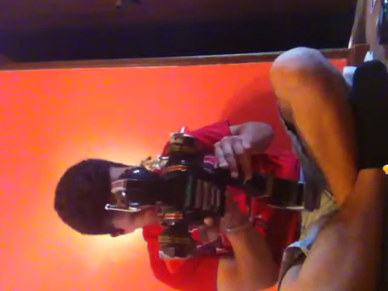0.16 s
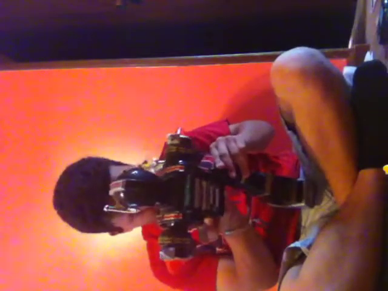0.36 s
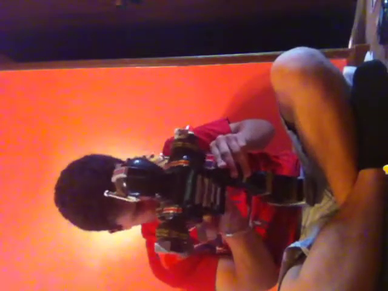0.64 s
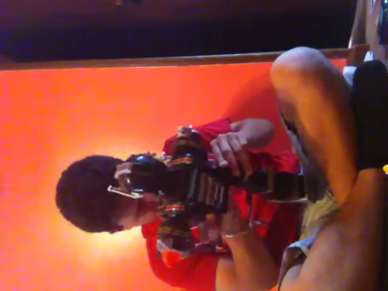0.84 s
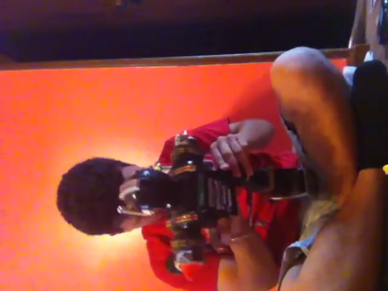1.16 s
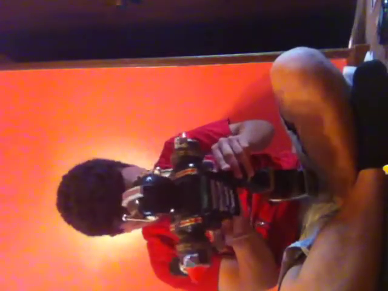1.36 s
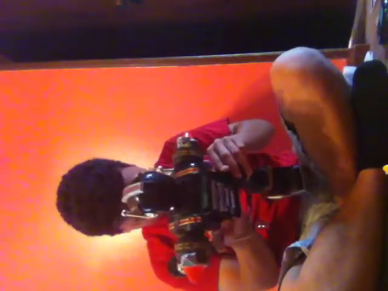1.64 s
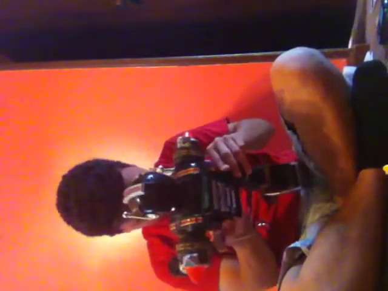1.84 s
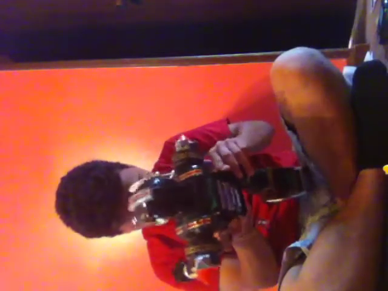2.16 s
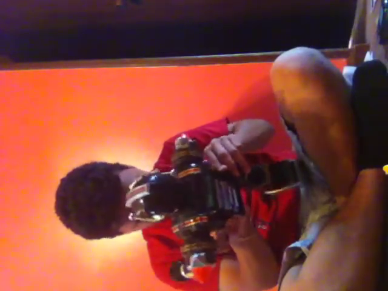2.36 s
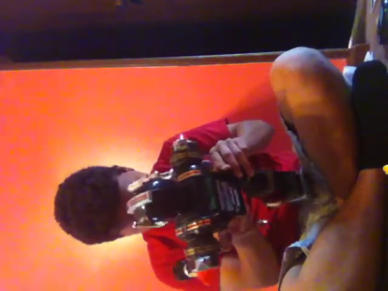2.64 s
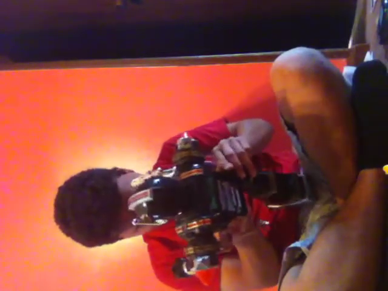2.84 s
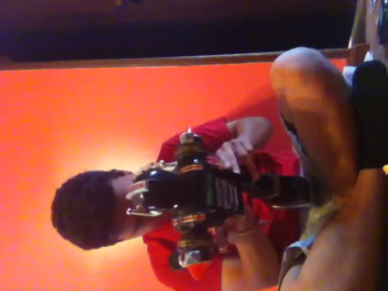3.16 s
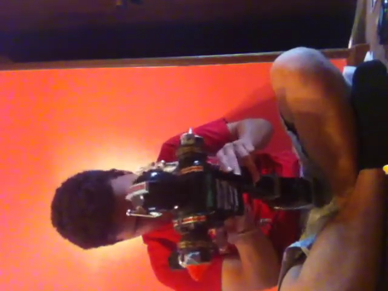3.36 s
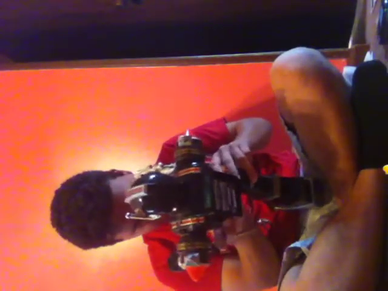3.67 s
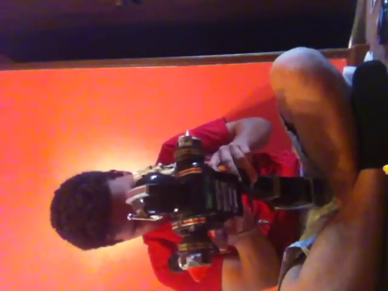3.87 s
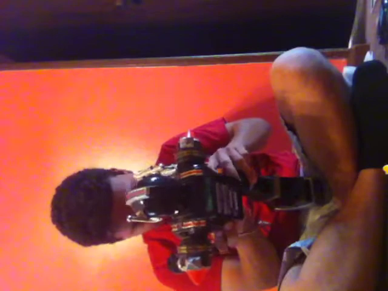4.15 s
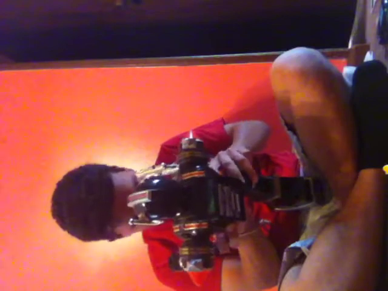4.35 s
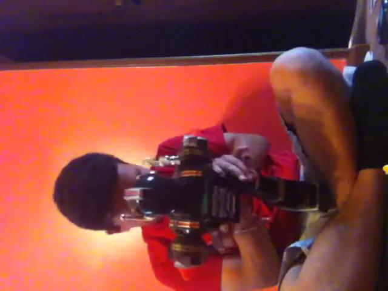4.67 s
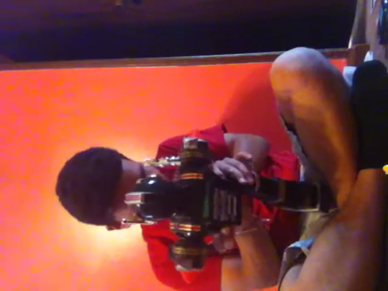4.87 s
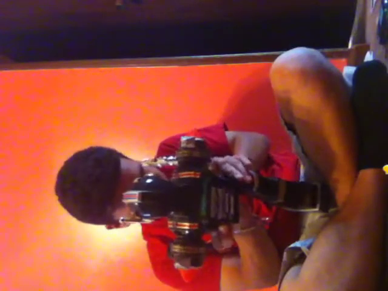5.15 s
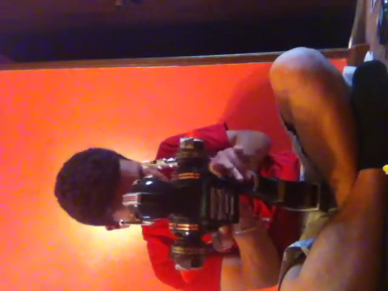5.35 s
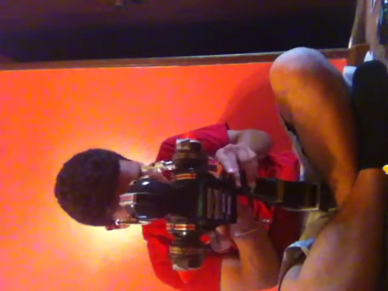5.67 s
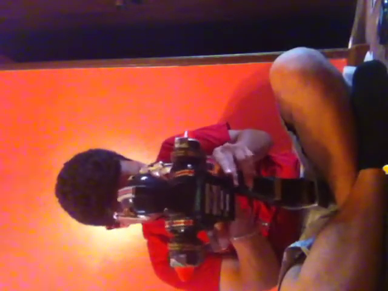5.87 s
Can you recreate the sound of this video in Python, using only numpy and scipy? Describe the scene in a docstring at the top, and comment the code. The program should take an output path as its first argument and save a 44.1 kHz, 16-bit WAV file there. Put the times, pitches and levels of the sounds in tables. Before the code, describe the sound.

A hollow plastic toy robot is handled in a small, quiet room, making short, irregular clicks, each with a tiny rattle and a slightly hollow knock. Faint rubs of sliding plastic run between them. Light ticks start at once, with sharper clicks at about 0.7, 2.3 and 2.9 seconds and small clusters in between. After a lull from about 3.2 to 3.8 seconds, light clicks return, with very faint fingertip taps and soft, low hand bumps from around 4.1. A tight joint gives one tiny, faint squeak at 4.6 seconds. A few quick clicks lead to a part snapping home at 4.9 seconds, by far the loudest sound, followed by another sharp click at 5.1. Lighter clicks and rubs continue until about 6 seconds. Each click has a brief room echo, over a faint, steady low hum and microphone hiss.

```python
"""A hollow plastic toy robot clicks as it is handled in a small, quiet room.
Each click is an edge slipping and striking: a small part rattles and the shell rings.
One part snaps home loudly. Sliding joints rub, a tight one squeaks once, fingertips
tap the shell and the hands bump softly. The walls echo briefly, over a low hum,
faint drones and microphone hiss."""
import sys
import numpy as np
from scipy import signal
from scipy.fft import rfft, irfft, next_fast_len
from scipy.io import wavfile
from scipy.ndimage import uniform_filter1d

SR = 44100
rng = np.random.default_rng(int(sys.argv[2]) if len(sys.argv) > 2 else 0)


def generate_wav(signal):
    """Clip the signal to [-1, 1] and save it as 16-bit WAV at the path in sys.argv[1]."""
    frames = np.transpose(np.atleast_2d(signal))
    scaled = np.clip(frames, -1, 1) * 32767
    pcm = np.round(scaled).astype(np.int16)
    wavfile.write(sys.argv[1], SR, pcm)


N = 265041
USUAL_NOTE_HZ, USUAL_STRENGTH_DB = 1100, -42  # an ordinary click; others are set relative to it
# Filters that split a click into thud, hollow knock, clack, snap and bright tick.
BANDS = [signal.butter(3, edges_hz, "bandpass", fs=SR, output="sos")
         for edges_hz in [(250, 850), (880, 1500), (1600, 3100), (2900, 5700), (6500, 17000)]]

# The tone of a small part's crack and rattle: frequency_hz, level_db
RATTLE_TONE = [(150, -15), (350, 1), (550, 9), (850, 3), (1600, -7), (3000, 0), (5000, 0.5), (8500, 7),
               (11300, 1.5), (12500, -7), (16000, -20)]
# The notes the hollow shell rings at: pitch_hz, level_db, ring_s (time to fade by 60 dB)
SHELL_NOTES = [(560, -12, .035), (720, -14, .03), (997, 1, .034), (1195, -1, .045), (1370, 0, .035),
               (1880, -10, .025), (2190, -9, .03), (2680, -9, .025), (3080, -1, .022), (3665, 2, .025),
               (4430, -2, .028), (4640, 0, .035), (6295, -7, .025), (7770, -2, .022), (8110, -1, .022),
               (8450, -2, .022)]
# One click a row. The knock is the shell's share; the treble falls away from the part's pitch.
# start_s, strength_db, knock_db, shell_note_hz, part_pitch_hz, treble_fall_db_per_octave
CLICKS = [(0.202, -49, -8, 780, 2000, 9), (0.605, -45.5, 1, 720, 1800, 7), (0.642, -39, -20, 850, 2870, 5),
          (0.729, -28, -32, 600, 3660, 4.5), (1.273, -37, -22, 1190, 3080, 14),
          (1.314, -40, -14.5, 880, 4000, 3), (1.554, -48, -26, 1250, 8600, 9),
          (1.795, -45.5, -19, 1150, 7800, 3), (1.926, -41, -27.5, 660, 9450, 9.5),
          (1.954, -47.5, -7, 1190, 1840, 2), (1.977, -43, -13, 1200, 3330, 6),
          (2.295, -31, -28, 1100, 3170, 7), (2.304, -32, -25, 1000, 8000, 4.5),
          (2.307, -29.5, -27, 1100, 4960, 8), (2.444, -51.5, -13, 1140, 1770, 3),
          (2.543, -41, -17, 1150, 1850, 4.5), (2.58, -43, -19, 1250, 3000, 3),
          (2.607, -40, -15.5, 930, 3650, 1.5), (2.667, -48.5, -3, 1250, 5950, 6),
          (2.917, -44, -12, 1180, 5380, 5), (2.943, -28.5, -18, 1175, 3300, 8),
          (3.047, -45.5, -11, 900, 2800, 1), (3.078, -43, -8.5, 1370, 2240, 1),
          (3.102, -45, -5, 800, 1880, 5), (3.223, -51, -8, 1090, 2600, 4),
          (3.762, -43.5, -25, 850, 6000, 4), (3.798, -50.5, -7, 1000, 1790, 6),
          (4.049, -43, -16, 684, 7000, 1.5), (4.088, -48.5, -3.5, 1190, 2180, 6),
          (4.392, -48, -9, 1010, 2700, 4), (4.408, -45, -20, 1050, 7600, 6),
          (4.43, -47.5, -26, 972, 8060, 6), (4.44, -45.5, -16, 980, 6770, 6),
          (4.652, -42.5, -27, 950, 4100, 6), (4.708, -45.5, -13.5, 1250, 4960, 8),
          (4.734, -45, -4, 1250, 2250, 4), (4.81, -37.5, -1, 1220, 3000, 8),
          (4.828, -39, -8, 800, 3400, 1.5), (4.882, -15.5, -10.5, 980, 3780, 3),
          (5.057, -37.5, -28, 950, 5100, 9), (5.133, -25.5, -18, 1100, 4800, 3),
          (5.344, -48, -18, 1000, 7800, 3), (5.449, -46, -9, 780, 2950, 3),
          (5.577, -40.5, -18, 676, 7040, 6), (5.583, -40.5, -2, 1190, 3280, 7),
          (5.637, -49, -22, 1320, 2900, 2), (5.678, -44, 1, 996, 3250, 7),
          (5.798, -51.5, -19, 870, 5070, 9), (5.881, -51, -4, 1370, 2340, 3),
          (5.924, -39.5, -34, 1000, 5400, 13), (5.98, -40.5, -15, 1190, 5000, 7)]
def click(row, rattle_s=.046, crack_s=.0067, crack_db=6, shell_db=-9):
    """An edge slips and strikes: a small part cracks and rattles, and the shell rings."""
    start_s, strength_db, _, note_hz, part_hz, _ = row
    t = np.arange(2400) / SR
    # a part that snaps home hard sits tighter and rattles for less time
    fade_s = rattle_s * gain_of(-.12 * (strength_db - USUAL_STRENGTH_DB))
    fade = gain_of(-60 * t / fade_s) + gain_of(crack_db - 60 * t / crack_s)
    noise = with_tone(rng.standard_normal(len(t)), RATTLE_TONE)
    rattle = unit_level(boost_note(noise, part_hz, db=9, sharpness=6)) * fade
    hz, level_db, ring_s = np.transpose(SHELL_NOTES)[:, :, None]
    # the shell rings most near the note of the struck spot and the pitch of the small part
    boost_db = 8.5 * sum(np.exp(-((hz - near_hz) / 90) ** 2) for near_hz in (note_hz, part_hz))
    waves = np.sin(2 * np.pi * (hz * t + rng.random(hz.shape)))
    shell = (gain_of(shell_db + level_db + boost_db - 60 * t / ring_s) * waves).sum(0)
    slip_s = .0008 * (.82 + gain_of(strength_db + 15.5))  # a tight catch slides home more slowly
    strike = (rattle + shell) * (1 - np.exp(-(t / slip_s) ** 2))
    sound = sum(gain_of(db) * unit_level(signal.sosfilt(band, strike))
                for db, band in zip(band_levels(*row[1:]), BANDS))
    peak = np.sqrt(uniform_filter1d(sound ** 2, size=132).max())  # level of the loudest 3 ms
    return start_s, sound * gain_of(strength_db - 1) / peak


# The middles of the clack, snap and bright tick bands: pitch_hz
TREBLE_MIDDLES_HZ = [2240, 4330, 9000]
# The starting shares of those three bands: level_db
TREBLE_SHARES_DB = [-9, -8, -12]
def band_levels(strength_db, knock_db, note_hz, part_hz, fall_db_per_octave):
    """Shares out a click: the shell gives the two low bands, the small part the three high ones."""
    harder_db = strength_db - USUAL_STRENGTH_DB
    thud_db = -10.5 + .57 * knock_db
    thud_db -= 11 * np.log2(note_hz / USUAL_NOTE_HZ)  # a spot with a higher note thuds less
    thud_db -= .3 * harder_db  # a hard snap is too brief to move the lows
    octaves_away = abs(np.log2(np.array(TREBLE_MIDDLES_HZ) / part_hz))
    brighter_db = .072 * harder_db * np.array([-1, 0, 1])  # harder: less clack, more tick
    treble_db = np.array(TREBLE_SHARES_DB) - fall_db_per_octave * octaves_away + brighter_db
    return [thud_db, knock_db, *treble_db]


# The tone of sliding plastic: frequency_hz, level_db
RUB_TONE = [(200, -27), (550, -4), (1200, 4.5), (1700, 0), (3000, -4), (5500, -0.5), (9000, -4.5),
            (12000, -12.5), (16000, -24)]
# One slide of part against part a row: start_s, length_s, level_db, note_hz
RUBS = [(.039, .03, -63, 1090), (0.173, .055, -60, 320), (.603, .045, -58, 750), (.624, .025, -57.5, 9500),
        (1.659, 0.18, -66, 6500), (1.951, .16, -61, 2300), (2.532, 0.026, -56, 664),
        (2.612, .14, -59, 6030), (2.973, .18, -58.5, 560), (3.738, 0.059, -58.5, 890),
        (4.376, .048, -53, 980), (4.587, 0.061, -53.5, 4720), (4.8, 0.036, -50, 1330),
        (4.826, .03, -53, 480), (4.869, .035, -45, 1440), (5.058, .045, -50.5, 1160),
        (5.065, .035, -57, 400), (5.14, .035, -49, 1080), (5.204, 0.071, -57.5, 4700),
        (5.326, 0.045, -55.5, 1200), (5.452, 0.027, -57, 640), (5.57, .045, -52, 1090),
        (5.983, .028, -51, 770)]
def rubs(catches_per_s=1200):
    """Sliding plastic catches and lets go in tiny uneven steps, which make the part ring."""
    catches = (rng.random(N) < catches_per_s / SR) * rng.choice([-1, 1], N)
    sizes = gain_of(4 * np.minimum(rng.exponential(1, N), 3))
    friction = with_tone(unit_level(catches * sizes) + .81 * rng.standard_normal(N), RUB_TONE)
    out = np.zeros(N)
    for start_s, length_s, level_db, note_hz in RUBS:
        boost_db = 14 - 2 * np.log2(note_hz / USUAL_NOTE_HZ)  # high notes are damped more
        piece = friction[int(start_s * SR):][:int(length_s * SR)]
        slide = unit_level(boost_note(piece, note_hz, boost_db, sharpness=12))
        add(out, start_s, gain_of(level_db) * slide * signal.windows.tukey(len(slide), .7))
    return out


# The tones that make up the squeak: pitch_multiple, level_db
SQUEAK_TONES = [(1, -4.5), (2, -6.5), (3, -13), (4, -11)]
def squeak(start_s=4.603, length_s=.047, level_db=-47.5, pitch_hz=1625, climb_hz_per_s=3000):
    """A tight joint sticks and slips very fast, rising in pitch as it is pushed."""
    t = np.arange(0, length_s, 1 / SR)
    waver, grip = unit_level(uniform_filter1d(rng.standard_normal((2, len(t))), size=26))
    slips_hz = (pitch_hz + climb_hz_per_s * t) * (1 + .036 * waver)
    cycles = np.cumsum(slips_hz) / SR
    tone = sum(gain_of(db) * np.sin(2 * np.pi * multiple * cycles) for multiple, db in SQUEAK_TONES)
    rough_tone = unit_level(tone * (1 + .3 * grip))
    swell = np.interp(t, [0, .026, length_s - .009, length_s], [0, 1, 1, 0])
    return start_s, rough_tone * swell * gain_of(level_db)


# When the fingers change their grip: start_s, end_s
GRIP_CHANGES = [(4.12, 4.37)]
def finger_taps(taps_per_s=12, notes_hz=(1050, 1300)):
    """Fingertips tap the shell faintly at uneven times. Gives rows like those of CLICKS."""
    times_s = np.concatenate([np.arange(start, end, 1 / taps_per_s) for start, end in GRIP_CHANGES])
    return [(start_s + late / taps_per_s, -55, 2, np.interp(spot, [0, 1], notes_hz), 1800, 6)
            for start_s, (late, spot) in zip(times_s, rng.random((len(times_s), 2)))]


def toy(clicks):
    """The clicks, rubs and squeak sent out in one direction; the fine detail is new each time."""
    out = rubs()
    for row in clicks:
        add(out, *click(row))
    add(out, *squeak())
    return out


# The dull tone of hands on the toy: frequency_hz, level_db
BUMP_TONE = [(50, -36), (110, -6), (180, 3), (300, -1), (450, -12), (900, -53), (4000, -70)]
# One shift of the hands a row: start_s, length_s, level_db
HAND_BUMPS = [(0.167, 0.15, -60.5), (4.1, 0.35, -64), (4.613, 0.69, -62)]
def hand_bumps():
    """The heavy toy shifts in the hands with a soft, low bumping."""
    swells = np.zeros(N)
    for start_s, length_s, level_db in HAND_BUMPS:
        add(swells, start_s, gain_of(level_db) * signal.windows.tukey(int(length_s * SR), .5))
    return swells * with_tone(rng.standard_normal(N), BUMP_TONE)


# How long the room rings: frequency_hz, ring_s (time to fade by 60 dB)
ECHO_TIMES = [(200, 0.47), (800, 0.21), (2000, .32), (5500, 0.35), (10000, 0.28), (15000, 0.3)]
# The tone the echo starts with: frequency_hz, level_db
ECHO_TONE = [(200, 1.5), (600, 4), (1000, 1), (2500, 2), (5000, -5), (7000, 0), (9000, 0.5), (15000, 0)]
def room_echo(sound, level_db=-7.5, build_s=.0037):
    """Reflections from the walls build up quickly, and each pitch fades at its own speed."""
    t = np.arange(SR // 2) / SR
    bounces = rng.standard_normal(len(t))
    for _ in range(4):  # even out the spectrum: well-scattered sound favours no single note
        spectrum = signal.stft(bounces, nperseg=1024)[2]
        bounces = signal.istft(spectrum / (abs(spectrum) + 1e-12))[1][:len(t)]
    hz, time_s, spectrum = signal.stft(bounces, SR, nperseg=256)
    fade_db = 60 * time_s / value_at(ECHO_TIMES, hz)[:, None]
    spectrum *= gain_of(value_at(ECHO_TONE, hz)[:, None] - fade_db)
    tail = signal.istft(spectrum, SR, nperseg=256)[1][:len(t)]
    tail *= 1 - np.exp(-(t / build_s) ** 2)
    return gain_of(level_db) * signal.fftconvolve(sound, tail / np.linalg.norm(tail))[:N]


# Faint, steady bands of noise: pitch_hz, width_hz, level_db
DRONES = [(91.5, 5, -74.5), (122.7, 23, -70.5), (166.6, 8.3, -69.5), (48, 31, -77), (1280, 590, -83),
          (6850, 410, -77.5)]
# The tone of the room's rumble and the microphone's hiss: frequency_hz, level_db
HISS_TONE = [(47, -39), (80, -1.5), (222, -5), (431, -13.5), (629, -14.5), (820, -18), (937, -18.5),
             (1090, -19), (1340, -19.5), (1460, -21), (2540, -21.5), (3100, -23), (5640, -23.5),
             (6890, -23), (16000, -29.5)]
def background(hum_hz=57.4, hum_db=-63.3, hiss_db=-58.5):
    """A low hum and faint drones sit in the rumble and hiss of a quiet room."""
    hz = np.fft.rfftfreq(N, 1 / SR)
    drone_power = 0
    for pitch_hz, width_hz, level_db in DRONES:
        hump = 1 / (1 + (2 * (hz - pitch_hz) / width_hz) ** 2)
        drone_power += (gain_of(level_db) * unit_level(hump)) ** 2
    drones = irfft(rfft(rng.standard_normal(N)) * np.sqrt(drone_power), N)
    hum = unit_level(np.sin(2 * np.pi * (hum_hz * np.arange(N) / SR + rng.random())))
    hiss = with_tone(rng.standard_normal(N), HISS_TONE)
    return gain_of(hum_db) * hum + drones + gain_of(hiss_db) * hiss


def gain_of(db):
    """Turns decibels into a number to multiply a sound by."""
    return 10 ** (np.asarray(db) / 20)


def unit_level(sound):
    """Scales a sound to an average (rms) level of one."""
    return sound / np.sqrt(np.mean(sound ** 2) + 1e-20)


def value_at(points, hz):
    """Reads between (frequency_hz, value) points, with octaves evenly spaced."""
    points_hz, values = np.transpose(points)
    return np.interp(np.log(hz + 1), np.log(points_hz + 1), values)


def with_tone(sound, tone):
    """Shapes a sound's lows and highs by a tone table, then sets its level to one."""
    size = next_fast_len(len(sound))
    gains = gain_of(value_at(tone, np.fft.rfftfreq(size, 1 / SR)))
    return unit_level(irfft(rfft(sound, size) * gains, size)[:len(sound)])


def boost_note(noise, hz, db, sharpness):
    """Lifts one briefly ringing note out of a noise."""
    ringing = signal.lfilter(*signal.iirpeak(hz, sharpness, fs=SR), noise)
    return noise + (gain_of(db) - 1) * ringing


def add(mix, start_s, sound):
    """Mixes a sound in at its start time."""
    part = mix[round(start_s * SR):][:len(sound)]
    part += sound[:len(part)]


def scene(walls=2):
    """Mixes everything. Each wall faces another side of the toy, so each gets its own echo."""
    clicks = CLICKS + finger_taps()
    echoes = sum(room_echo(toy(clicks)) for _ in range(walls)) / np.sqrt(walls)
    return (toy(clicks) + echoes + hand_bumps() + background())[None]


def record(dry, cutoff_hz=15900):
    """Cuts away the very highest treble."""
    low_pass = signal.firwin(511, cutoff_hz, window=("kaiser", 9), fs=SR)
    return signal.oaconvolve(dry, low_pass[None], "same")


dry = scene()
out = record(dry)
generate_wav(out)
```